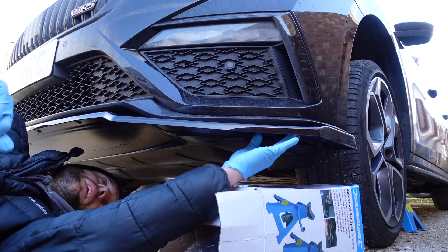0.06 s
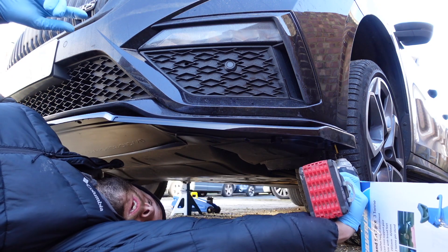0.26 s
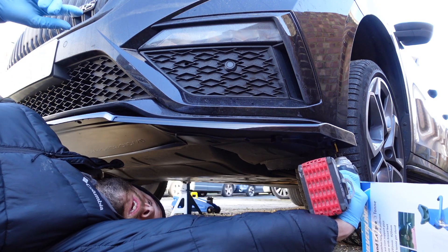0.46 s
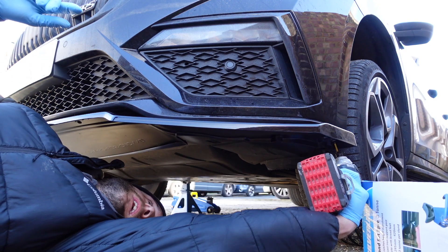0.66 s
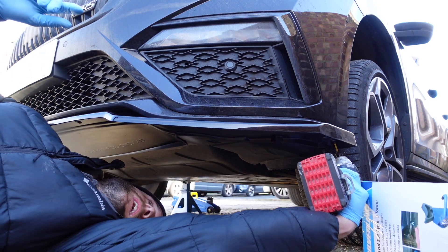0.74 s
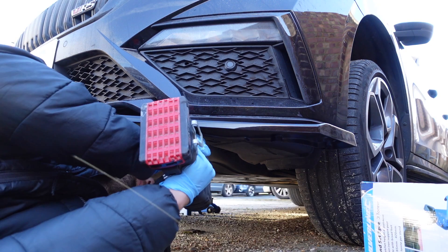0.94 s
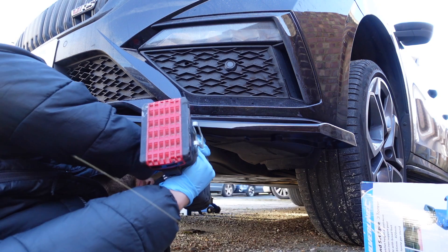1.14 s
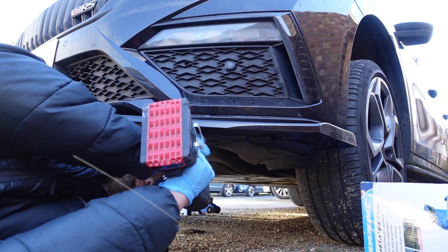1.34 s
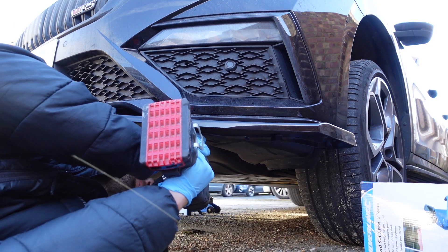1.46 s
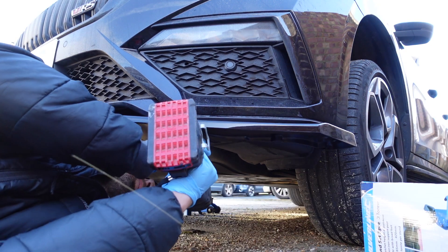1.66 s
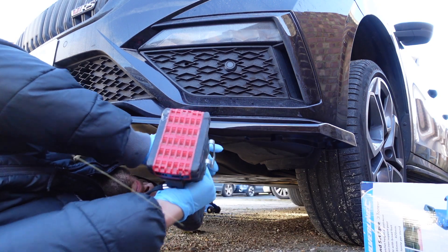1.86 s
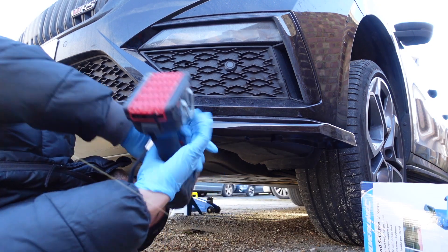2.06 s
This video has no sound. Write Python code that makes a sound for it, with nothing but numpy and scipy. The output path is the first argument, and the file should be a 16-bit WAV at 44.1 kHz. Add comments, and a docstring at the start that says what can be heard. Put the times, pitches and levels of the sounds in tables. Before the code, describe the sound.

A cordless driver whines on a screw, then ratchets with a rapid metallic clatter.

```python
"""Outdoors, under the front of a car, a cordless driver works on a screw close by. Sleeves rustle,
the tool knocks on a panel, the bit clicks into place and the motor whines under a wavering load.
After a short pause the tool ratchets about 33 times a second, stalls and runs down. Its impacts
excite the modes of steel and panel; ground and underbody reflect them, over a distant rumble and hum."""
import sys
import numpy as np
from scipy import signal
from scipy.fft import rfft, irfft, next_fast_len
from scipy.io import wavfile

SR = 44100
rng = np.random.default_rng(int(sys.argv[2]) if len(sys.argv) > 2 else 0)


def log_audio(samples):
    """Write samples as a 16-bit WAV file to the path given in sys.argv[1]."""
    # one column per channel
    frames = np.atleast_2d(samples).T
    # limit to full scale, then quantise
    limited = np.clip(frames, -1, 1)
    pcm = np.round(limited * 32767).astype(np.int16)
    wavfile.write(sys.argv[1], SR, pcm)


N = 92610
T = np.arange(N) / SR
ANTIPHASE = np.array([[1], [-1]])  # left, right

# modes of the panel that takes the knocks and thuds: freq_hz, level_db, t60_s
PANEL_MODES = [(166, -2.5, 0.026), (222.9, -12.5, 0.31), (341.3, -5, 0.046), (435, -4.5, 0.035),
               (651.7, -0.5, 0.022), (926, -22, 0.03), (1148, -10.5, 0.089), (1464, -1.5, 0.027)]


def from_db(db):
    """Decibels to amplitude ratio."""
    return 10 ** (np.asarray(db) / 20)


def rms_one(x):
    """Normalisation to unit rms."""
    return x / np.sqrt(np.mean(x ** 2) + 1e-20)


def in_time(rows):
    """Linear interpolation of a control curve at every sample."""
    return np.interp(T, *np.transpose(rows))


def drift(hz):
    """Low-passed noise: a smooth random wander of unit rms."""
    r = np.exp(-2 * np.pi * hz / SR)
    return rms_one(signal.lfilter([1], [1, -2 * r, r * r], rng.standard_normal(N + SR))[SR:])


def cut(x, hz, kind, order=2):
    """Maximally flat low-pass or high-pass filter."""
    return signal.sosfilt(signal.butter(order, hz, kind, fs=SR, output="sos"), x)


def colour(x, spectrum):
    """Minimum-phase filter with the given spectrum and unit power gain."""
    size = 2 * next_fast_len(N)
    hz, db = np.transpose(spectrum)
    bin_hz = np.arange(size // 2 + 1) * SR / size
    gain = rms_one(from_db(np.interp(np.log(bin_hz + 1), np.log(hz), db)))
    cepstrum = irfft(np.log(gain))
    cepstrum[1:size // 2] *= 2
    cepstrum[size // 2 + 1:] = 0
    return irfft(rfft(x, size) * np.exp(rfft(cepstrum)))[:N]


def noise(spectrum, flutter_db, flutter_hz):
    """Coloured noise under random amplitude modulation, at unit rms."""
    return rms_one(colour(rng.standard_normal(N) * from_db(flutter_db * drift(flutter_hz)), spectrum))


def impulses(start_s, level_db):
    """Ideal impacts: one impulse for each event."""
    train = np.zeros(N)
    np.add.at(train, np.clip((start_s * SR).astype(int), 0, N - 1), from_db(level_db))
    return train


def ring(force, modes):
    """Modal superposition: damped resonators driven by one force."""
    response = 0
    for hz, db, t60_s in modes:
        r = np.exp(-np.log(1000) / (t60_s * SR))
        feedback = [1, -2 * r * np.cos(2 * np.pi * hz / SR), r * r]
        response += from_db(db) * signal.lfilter([.5, 0, -.5], feedback, force + 1e-18)
    return response


def echoes(x, t60_s):
    """Diffuse reflection: a dense, exponentially decaying tail, weak in the bass."""
    age = T[:SR // 4]
    tail = rng.standard_normal(len(age)) * np.exp(-np.log(1000) * age / t60_s) * (age > .001)
    tail = cut(tail, 500, "high", order=1)
    return signal.fftconvolve(x, tail / np.sqrt(np.sum(tail ** 2)))[:N]


def pan(x, left_db):
    """Localisation by interaural level difference; the bass stays central."""
    return x + cut(x, 480, "high") * (from_db([[left_db / 2], [-left_db / 2]]) - 1)


def rumble():
    """Distant low noise, highly correlated between the ears."""
    # background envelope: time_s, level_db
    envelope = [(0, -36.5), (.4, -33.5), (.8, -39.5), (.9, -41.5), (1.55, -64), (1.75, -34), (2.1, -47)]
    # background spectrum: freq_hz, level_db
    spectrum = [(25, -54), (50, -23), (75, -8), (110, 3), (220, 5), (450, -4.5), (1000, -2.5),
                (2000, -10.5), (5000, -23), (16000, -40)]
    mid, side = (noise(spectrum, flutter_db=-2, flutter_hz=9.1) for _ in range(2))
    return from_db(in_time(envelope)) * (mid + from_db(-22.5) * side * ANTIPHASE)


def hum():
    """A distant pure tone, slowly modulated in frequency and amplitude."""
    # course of the hum: time_s, pitch_hz, level_db
    course = [(0, 74.5, -40), (.6, 74.5, -47), (0.831, 76.47, -36), (.9, 77.46, -55), (1.598, 95.8, -60),
              (1.8, 104.8, -40), (2.1, 102.4, -39.5)]
    time_s, pitch_hz, level_db = np.transpose(course)
    cycles = np.cumsum(np.interp(T, time_s, pitch_hz)) / SR
    return from_db(np.interp(T, time_s, level_db)) * np.sin(2 * np.pi * cycles)


def sleeves():
    """Friction of cloth radiates broadband noise: a grainy rustle and a treble swish."""
    # envelopes: time_s, level_db
    swish_level = [(.12, -87), (.13, -49), (.24, -52), (.86, -108), (1.65, -62), (1.72, -30), (1.77, -45),
                   (1.81, -39.5), (1.95, -42), (2.05, -45.5), (2.1, -33.5)]
    rustle_level = [(0, -55), (.117, -50), (.125, -33), (.2, -34), (.25, -35.5), (.85, -55), (.96, -56),
                    (1.68, -57), (1.8, -31), (1.88, -33), (1.94, -38), (2.02, -36.5), (2.06, -35),
                    (2.1, -33)]
    # spectra: freq_hz, level_db
    swish_spectrum = [(1500, -6), (4000, -2), (7500, -2), (11000, -6.5), (16000, -15)]
    rustle_spectrum = [(100, 2), (300, -2.5), (700, -13.5), (1300, -5), (2300, -2.5), (4000, -9.5),
                       (8000, -17), (16000, -38)]
    swish = from_db(in_time(swish_level)) * noise(swish_spectrum, flutter_db=1, flutter_hz=100)
    rustle = from_db(in_time(rustle_level)) * noise(rustle_spectrum, flutter_db=3, flutter_hz=79)
    return swish + rustle


def panel_knocks():
    """Impact excitation: the tool knocks the panel's modes into ringing; it gives with dull bumps."""
    # impacts on the panel: start_s, level_db
    knock_hits = [(0.142, -20.5), (0.203, -21), (.266, -16), (1.664, -21), (1.737, -20), (1.831, -25),
                  (1.989, -36)]
    bump_hits = [(.268, -13.5), (.282, -7.5), (0.301, -8.5), (0.386, -20.5), (1.621, -19), (1.66, -12),
                 (1.715, -18), (1.868, -24)]
    bump_mode = [(173.6, 0, 0.051)]  # freq_hz, level_db, t60_s
    knocks = ring(impulses(*np.transpose(knock_hits)), PANEL_MODES)
    bumps = ring(impulses(*np.transpose(bump_hits)), bump_mode)
    return cut(knocks, 890, "low") + cut(bumps, 620, "low")


def motor():
    """Partials track the motor's speed over gear hiss; an eccentric gear modulates their amplitude."""
    # whine under a wavering load: time_s, pitch_hz
    pitch = [(.25, 483.5), (.295, 689), (.335, 733), (.425, 765), (.447, 739), (.475, 758), (.515, 722),
             (.572, 692.6), (.62, 751.6), (.652, 724), (.688, 759), (.732, 728), (.768, 782), (.8, 687),
             (.85, 539)]
    # motor envelope: time_s, level_db
    envelope = [(.225, -67), (.245, -29.5), (.29, -22), (.38, -22.5), (.47, -20.5), (.52, -23),
                (.57, -20.5), (.61, -22), (.68, -22), (.72, -21.5), (.75, -22.5), (.795, -20.5),
                (.826, -26), (.85, -40), (.88, -80)]
    # partials of motor and gears: pitch_ratio, level_db
    partials = [(.655, -19), (1, -15.5), (1.31, -18), (2, -8.5), (2.61, -13.5), (3, -6.5), (4.02, -5.5),
                (4.55, -12), (5, -4), (5.96, -6.5), (7, -17), (7.8, -14.5)]
    # spectrum of the gear hiss: freq_hz, level_db
    gear_spectrum = [(150, -13), (400, -7.5), (900, -15), (1400, -13), (2200, -9), (3000, 1), (3800, -4),
                     (4600, -4), (5600, -12.5), (8000, -10.5), (11000, -19), (16000, -28)]
    full_speed_hz, cycles_per_throb, throb_depth = 723, 21, 0.4
    jitter, flutter_db, rasp_db = 0.0057, 2.5, 1.15
    pitch_hz = in_time(pitch)
    cycles = np.cumsum(pitch_hz * (1 + jitter * drift(hz=111))) / SR
    whine = 0
    for ratio, db in partials:
        throb = 1 + throb_depth * np.sin(2 * np.pi * (cycles / cycles_per_throb + rng.random()))
        amplitude = from_db(db + flutter_db * drift(hz=45.3)) * throb
        whine += amplitude * np.sin(2 * np.pi * (ratio * cycles + rng.random()))
    whine *= np.minimum(pitch_hz / full_speed_hz, 1) ** 2  # rises out of the hiss with speed
    gain = from_db(in_time(envelope) + rasp_db * drift(hz=59))
    hiss = from_db(-1.5) * noise(gear_spectrum, flutter_db=0, flutter_hz=90.5)
    return gain * (whine + hiss)


def chatter(start_s, level_db, decay_s):
    """Steel on steel: dense contacts merge into a noise burst that decays within milliseconds."""
    age, attack_s = T[:SR // 20], 0.00027
    burst = (1 - np.exp(-(age / attack_s) ** 2)) * np.exp(-age / decay_s)
    envelope = signal.fftconvolve(impulses(start_s, level_db), burst / burst.max())[:N]
    return envelope * rng.standard_normal(N)


def steel(contacts):
    """Contacts radiate directly and excite the chuck's resonances and the steel's dense high modes."""
    # contact spectrum: freq_hz, level_db
    spectrum = [(300, -20), (1200, -14), (2700, -4.5), (4400, -4.5), (6000, -2), (7500, 2), (9500, -3),
                (12000, -9), (16000, -19.5)]
    # modes of chuck and bit: freq_hz, level_db, t60_s
    chuck_modes = [(2666, 2.5, 0.076), (3672, 18, .05), (5250, -5, 0.053), (6800, 3, .09), (7030, 9, .12),
                   (7000, -33, .06), (8700, -6, .035), (9100, -5, .12), (9600, 11, 0.049),
                   (11700, -23, .05)]
    direct = colour(contacts, spectrum)
    shimmer = cut(echoes(direct, t60_s=0.13), 6000, "high")
    return direct + from_db(-59.5) * ring(contacts, chuck_modes) + from_db(-17) * shimmer


def bit_clicks():
    """Each click of the bit is a contact transient followed by free vibration."""
    # single clicks: start_s, level_db
    clicks = [(0.2324, -10), (0.251, -21), (0.2638, -11), (0.283, -21), (0.9721, -16.5), (1.692, -9.5)]
    # modes of the bit: freq_hz, level_db, t60_s
    bit_modes = [(5060, -13, 0.061), (5720, -13, 0.059)]
    start_s, level_db = np.transpose(clicks)
    contacts = chatter(start_s, level_db, decay_s=0.0017)
    return steel(contacts) + ring(impulses(start_s, level_db), bit_modes)


def socket_rattle():
    """Impacts of the loose socket excite its heavily damped modes."""
    # rattles: start_s, level_db
    hits = [(0.2661, -18.5), (1.638, -16.5), (1.658, -19), (1.667, -17), (1.679, -19), (1.686, -16),
            (1.749, -28.5)]
    # modes of the socket: freq_hz, level_db, t60_s
    socket_modes = [(1556, -2.5, 0.022), (1950, -3, 0.015), (2360, 4, 0.024), (2735, 9.5, 0.013),
                    (3060, -20, 0.018), (3530, -7, 0.022)]
    return ring(impulses(*np.transpose(hits)), socket_modes)


def ratchet():
    """A near-periodic impact train: the dogs catch, thud into the screw and slip as the motor grinds."""
    # blows, with the delay from catch to release clack: start_s, level_db, slip_s
    blows = [(0.99, -1.5, 0.01), (1.019, -0.5, 0.0097), (1.049, -0.5, 0.01), (1.080, 2, 0.0086),
             (1.110, 0, 0.008), (1.139, 0, 0.0091), (1.1687, -0.5, 0.0103), (1.2, 0, .010),
             (1.2316, -0.5, 0.0091), (1.2613, 0.5, .010), (1.2927, 0.5, 0.0095), (1.3239, -0.5, .0097),
             (1.3556, 0.5, 0.0094), (1.3849, -0.5, 0.0095), (1.414, -1, 0.0098), (1.4429, -1.5, 0.0102),
             (1.4714, -0.5, 0.0094), (1.500, -1.5, 0.011), (1.5284, -0.5, 0.0086), (1.557, 0, 0.0094),
             (1.5868, -1, 0.0096), (1.6187, -2, .011), (1.665, -3, 0.011)]
    # coupling of the thuds to the panel: time_s, level_db
    coupling = [(.99, 5.5), (1.02, 2), (1.14, 2.5), (1.175, 2.5), (1.36, 1.5), (1.39, 0.5), (1.59, -0.5),
                (1.623, 5), (1.67, -4)]
    # envelope of the motor under load: time_s, level_db
    grind_level = [(.966, -54.5), (.973, -20), (1.1, -22), (1.35, -20), (1.6, -21), (1.645, -19),
                   (1.665, -21), (1.688, -18), (1.703, -26.5), (1.76, -42), (1.85, -55)]
    # spectrum of the grinding: freq_hz, level_db
    grind_spectrum = [(100, -19), (220, -8), (600, 0), (900, -7), (1600, -2.5), (2100, -1.5), (2800, 2.5),
                      (4500, -8), (7500, -5.5), (10000, -10.5), (16000, -27)]
    start_s, level_db, slip_s = np.transpose(blows)
    thud_s = start_s + 0.00349
    thud_db = np.interp(start_s, *np.transpose(coupling)) - 16.5
    catches = chatter(start_s, level_db - 10, decay_s=0.0021)
    cracks = chatter(thud_s, level_db - 11, decay_s=0.00097)
    clacks = chatter(start_s + slip_s, level_db - 7.5, decay_s=0.0021)
    thuds = ring(impulses(thud_s, thud_db), PANEL_MODES)
    thuds = cut(cut(thuds, 1690, "low"), 129, "high")
    grind = from_db(in_time(grind_level)) * noise(grind_spectrum, flutter_db=3.5, flutter_hz=149.2)
    return steel(catches + cracks + clacks) + thuds + grind


def scene():
    """Superposition of direct sound, reflections between ground and underbody, and the background."""
    # spectrum of the lateral reflections: freq_hz, level_db
    lateral_spectrum = [(100, -27), (300, -10), (500, 9.5), (1000, 11.5), (2000, -12), (4500, 0),
                        (16000, -5.5)]
    whir, blows = motor(), ratchet()
    handling = bit_clicks() + sleeves() + panel_knocks() + socket_rattle()
    direct = pan(whir, left_db=-2.24) + pan(blows, left_db=-1.5) + handling
    thrown_sideways = from_db(-1.5) * whir + from_db(-4) * blows + handling
    lateral = from_db(-23) * colour(echoes(thrown_sideways, t60_s=0.1), lateral_spectrum)
    treble_spread = from_db(-21) * cut(echoes(blows + handling, t60_s=0.0079), 2540, "high")
    # the whine carries less close echo than the blows and handling sounds
    near = from_db(-8) * echoes(from_db(-6) * whir + blows + handling, t60_s=0.021)
    return direct + near + (lateral + treble_spread) * ANTIPHASE + rumble() + hum()


def record(dry):
    """Soft saturation rounds the highest peaks; band limiting cuts both ends of the spectrum."""
    ceiling, cutoff_hz = 0.97, 16000
    rounded = ceiling * np.tanh(cut(dry, 81, "high") / ceiling)
    return signal.sosfilt(signal.ellip(12, .1, 90, cutoff_hz, fs=SR, output="sos"), rounded)


dry = scene()
out = record(dry)
log_audio(out)
```